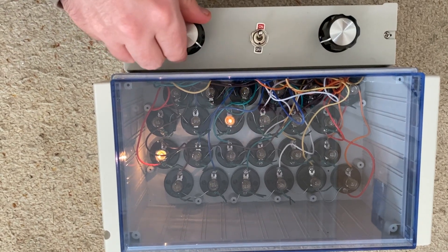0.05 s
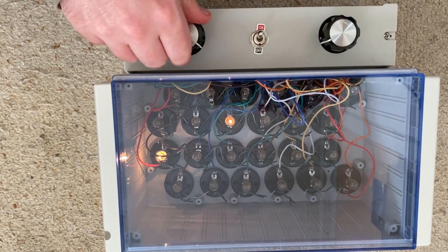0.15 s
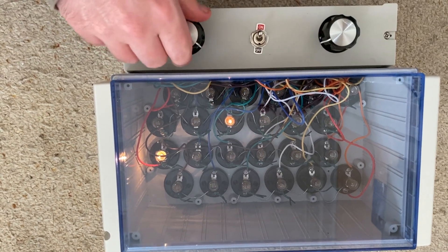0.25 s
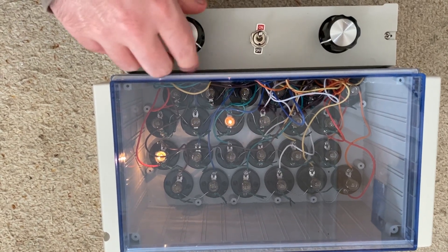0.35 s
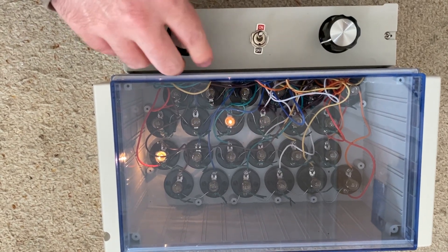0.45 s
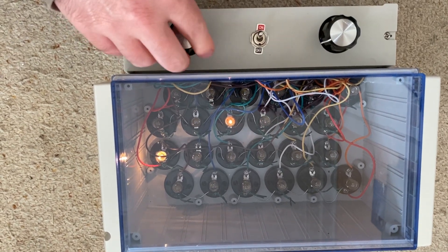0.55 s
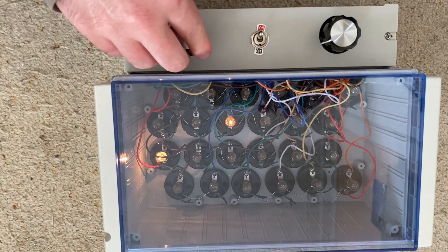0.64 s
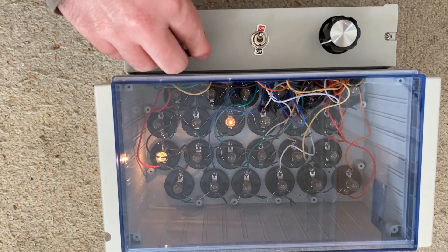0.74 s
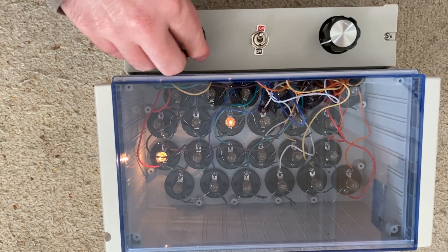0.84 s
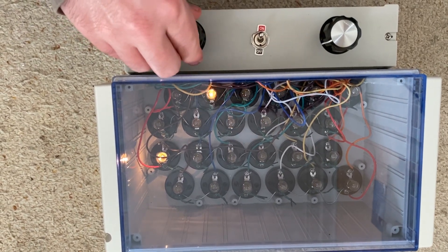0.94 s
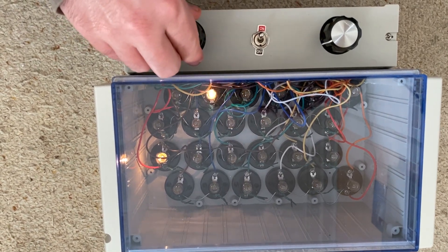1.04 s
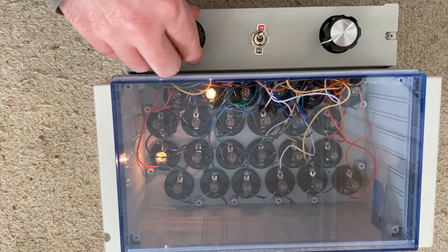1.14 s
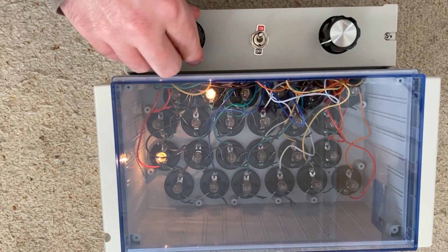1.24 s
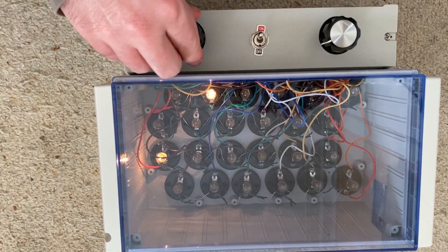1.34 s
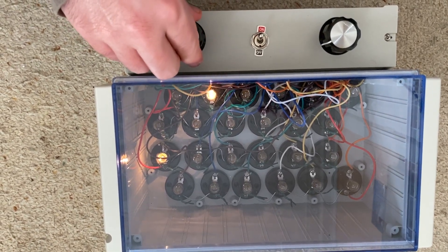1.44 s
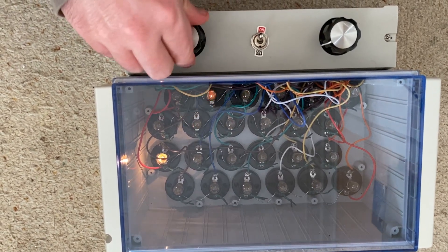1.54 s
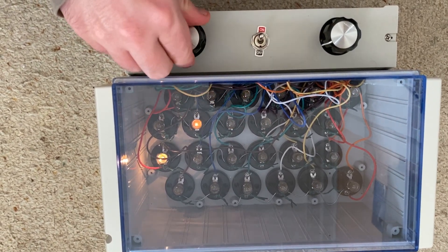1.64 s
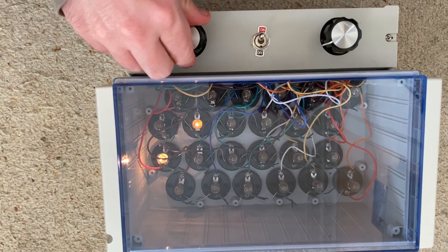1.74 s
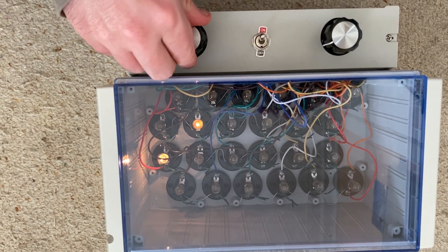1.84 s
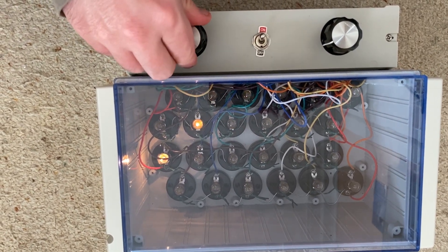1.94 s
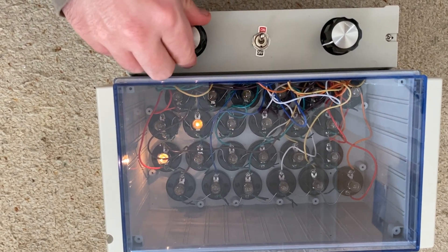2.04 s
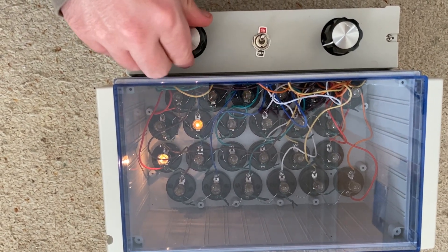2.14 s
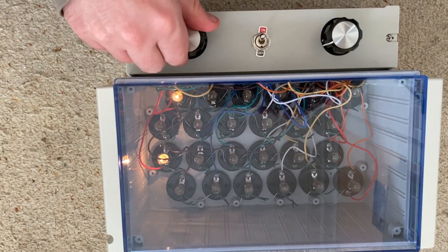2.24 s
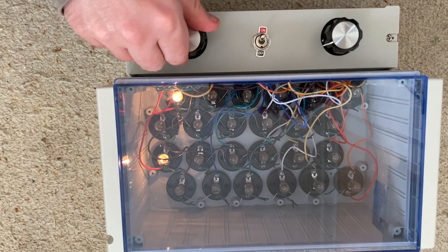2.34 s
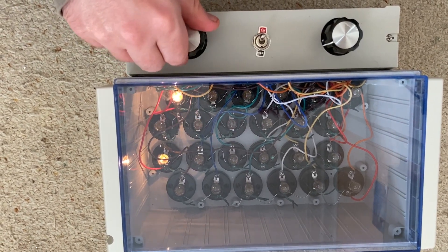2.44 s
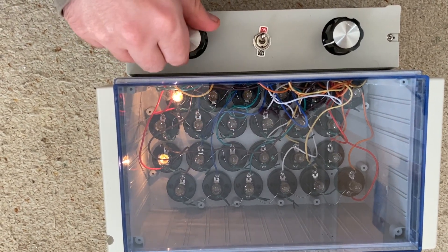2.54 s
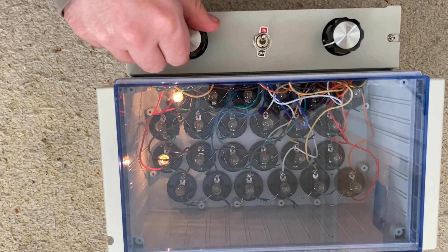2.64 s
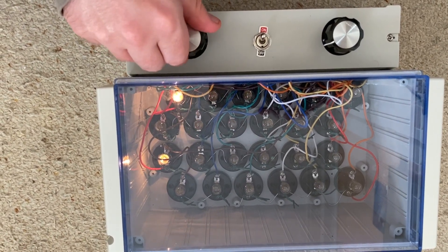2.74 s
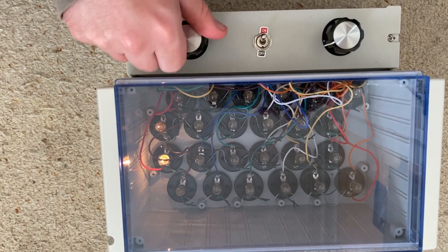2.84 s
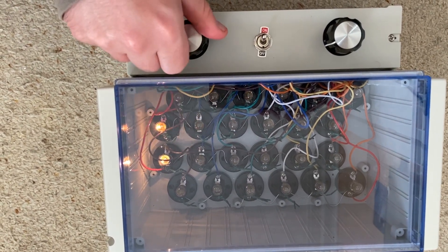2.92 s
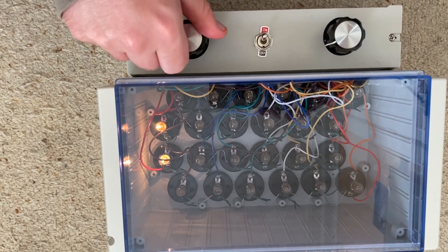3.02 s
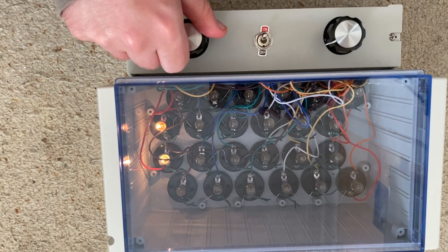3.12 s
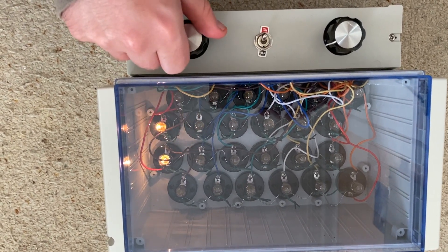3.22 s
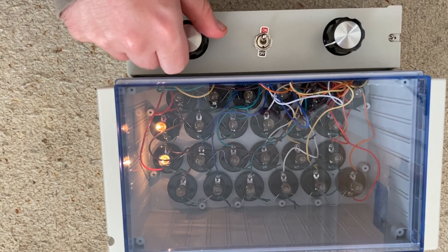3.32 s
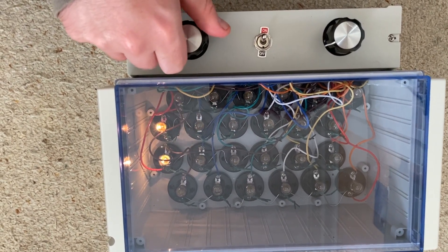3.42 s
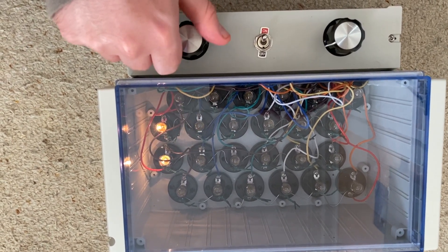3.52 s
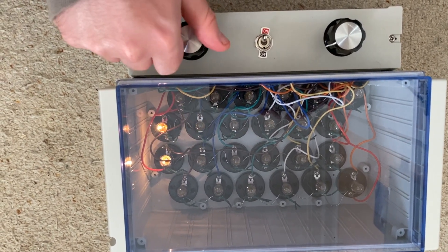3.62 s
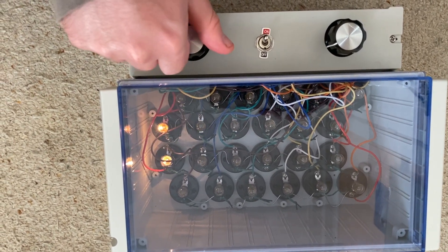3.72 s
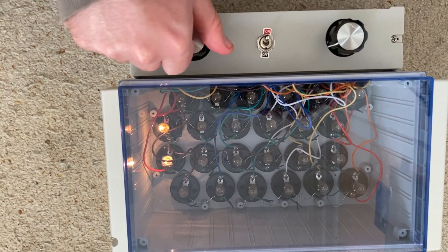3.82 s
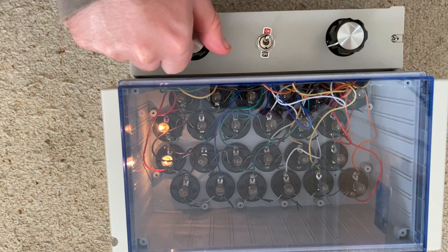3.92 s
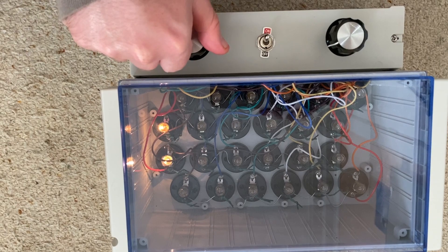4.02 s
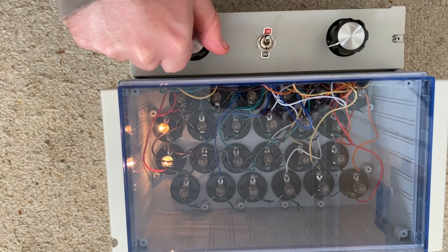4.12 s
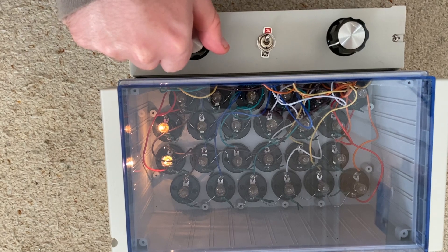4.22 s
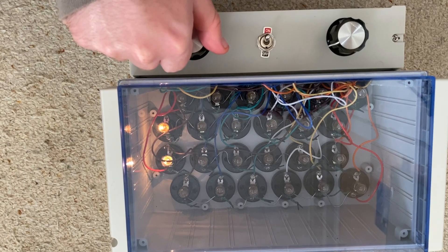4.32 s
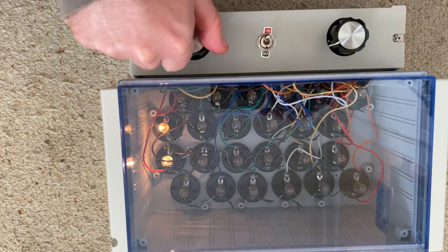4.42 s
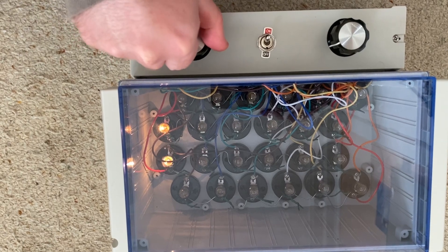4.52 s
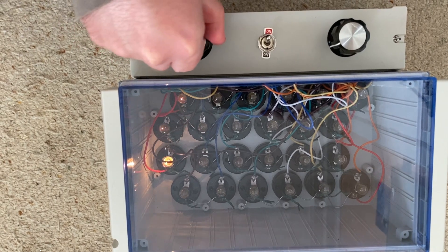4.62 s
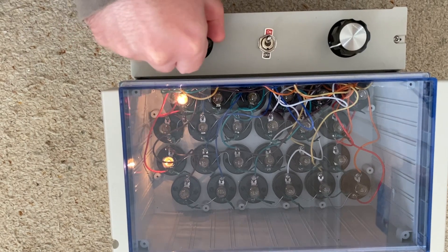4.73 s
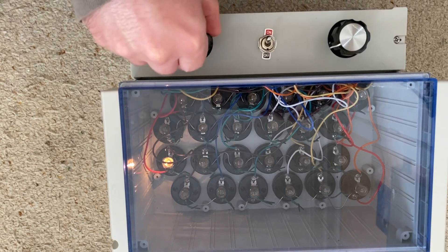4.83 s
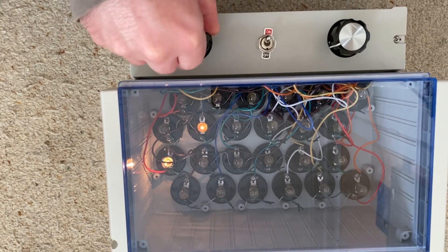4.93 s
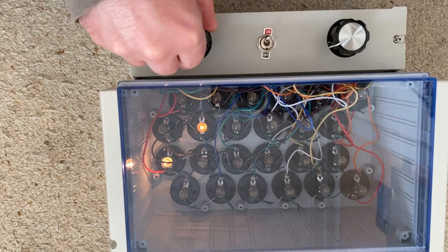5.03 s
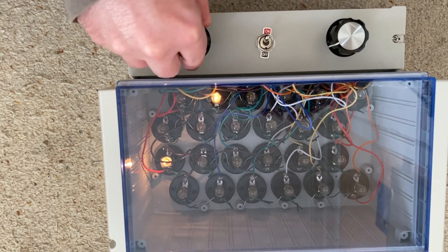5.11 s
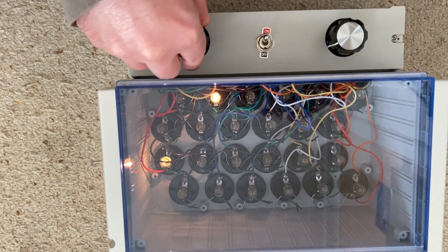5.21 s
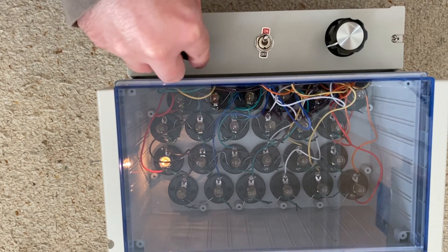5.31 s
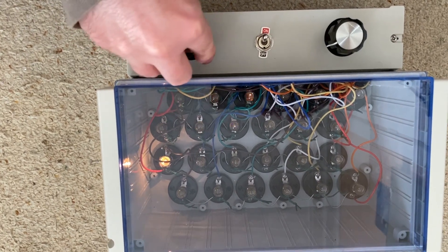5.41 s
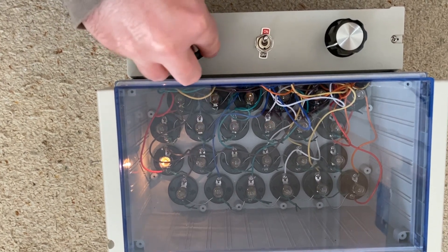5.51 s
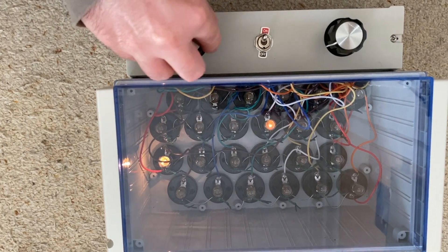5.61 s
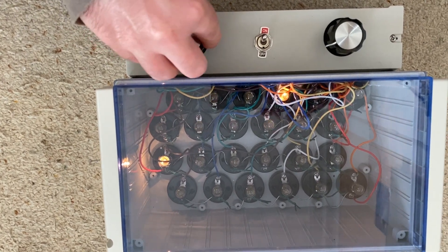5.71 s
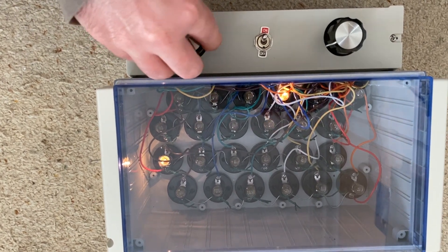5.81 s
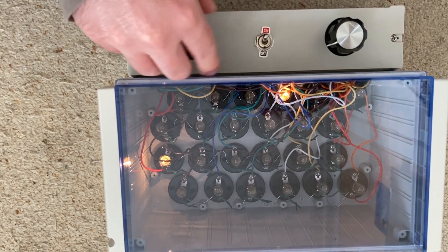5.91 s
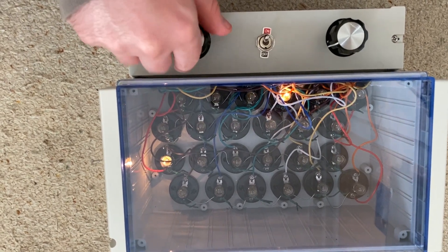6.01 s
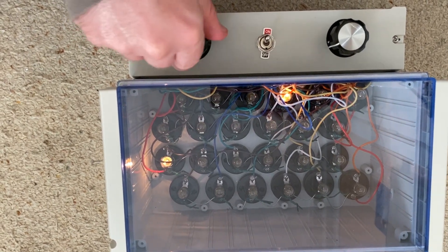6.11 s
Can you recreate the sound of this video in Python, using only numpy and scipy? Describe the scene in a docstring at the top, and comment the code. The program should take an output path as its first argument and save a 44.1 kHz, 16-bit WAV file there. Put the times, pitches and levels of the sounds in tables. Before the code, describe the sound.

A low handling rumble opens, and fingers bump a knob with a round, hollow knock at about 0.3 seconds. A rotary switch then clicks through four slow steps at 0.9, 1.5, 2.2 and 2.8 seconds, the last two softer. Each step is a sharp spring snap with a small knock and clink in a metal panel, plus a dull thud as the plastic box rocks on carpet. A light tick comes just before each. The rumble fades down, and a pause follows with faint ticks near 3.4 and 4.5 seconds. From 4.6 to 5.6 seconds the switch runs through seven quick, crisp clicks. Around 6 seconds the fingers knock the knob and shove the box, making a short cluster of hollow bumps, the loudest moment. Everything is close to the microphone, with short small-room reflections, dull room air and a faint hiss underneath.

```python
"""Fingers bump a knob over a low rumble, then a rotary switch clicks: four slow steps, a quick run of seven.
At each step the detent spring snaps, the shaft seats with a knock in the metal panel, and the plastic
case of the home-made lamp box thuds and rocks on the carpet. Light ticks and soft bumps fall around
the steps. A small room reflects them; room air and a faint hiss lie underneath."""
import sys
import numpy as np
from scipy import signal
from scipy.fft import rfft, irfft, next_fast_len
from scipy.io import wavfile
from scipy.ndimage import uniform_filter1d

SR = 44100
rng = np.random.default_rng(int(sys.argv[2]) if len(sys.argv) > 2 else 0)


def master_out(mix):
    """Clip the mix to full scale and print it as 16-bit PCM to the path in sys.argv[1]."""
    frames = np.transpose(np.atleast_2d(mix))
    ceiling = np.clip(frames, -1, 1)
    pcm = np.round(ceiling * 32767).astype(np.int16)
    wavfile.write(sys.argv[1], SR, pcm)


N = 271656

# switch steps: start_s, snap_db, jolt_db, rebound_lag_s, rebound_vs_snap_db,
#               seat_lag_s, knock_db, clink_db, thud_db, rock_db
STEPS = [(0.9015, -21, -22.5, 0.0011, -15, 0.0077, -18, -28, -22, -14.5),
         (1.545, -22.5, -21, .0031, -1, 0.01, -23.5, -32, -20.5, -19),
         (2.205, -30.5, -27.5, 0.0038, 4, 0.016, -32, -36.5, -23, -19.5),
         (2.8017, -27.5, -26.5, 0.0034, -0.5, .0116, -25, -35.5, -19, -20),
         (4.6228, -17.5, -22.5, 0.0036, -10, 0.0065, -16.5, -27.5, -20.5, -9),
         (4.8032, -21.5, -30.5, 0.0033, -18, 0.024, -36, -52, -27, -19),
         (5.062, -24.5, -24, .0027, 5, 0.011, -20.5, -26.5, -22, -14),
         (5.2769, -17.5, -22, 0.004, -7.5, .0086, -20, -20, -23, -16),
         (5.3970, -18, -21.5, 0.0028, -3, 0.0088, -23.5, -33.5, -27.5, -19.5),
         (5.5004, -18, -23, 0.0032, -10, 0.0095, -30.5, -36, -27, -18.5),
         (5.6392, -20, -25, .0024, -1.5, 0.011, -34, -33, -23.5, -17)]
# knob taking up its play: start_s, panel_db, hardness_hz, spring_db, case_db
TICKS = [(.3280, -29.5, 4000, -46, -19.5), (0.85, -38.5, 2100, -52.5, -28.5),
         (1.514, -38, 4000, -42.5, -22.5), (2.1515, -30, 1780, -45.5, -21), (2.7544, -41.5, 2620, -49, -26),
         (3.4376, -39, 1600, -64, -21.5), (4.5118, -40.5, 1294, -69, -24.5),
         (4.5360, -41.5, 2200, -73, -37.5), (4.995, -50.5, 4000, -60, -50.5),
         (5.863, -43.5, 1295, -61.5, -32.5), (5.939, -22.5, 1600, -38.5, -15.5),
         (5.964, -22.5, 2000, -53, -19)]
# fingers on the knob: start_s, level_db, hardness_hz
BUMPS = [(.140, -35.5, 495), (.3283, -13.5, 1530), (.3343, -11.5, 630), (5.9430, -12, 450),
         (5.9690, -11.5, 495), (5.9725, -8.5, 1460), (5.978, -2, 800)]
# hand shoving the box: start_s, level_db
SHOVES = [(5.015, -17), (5.986, -4)]

# resonances of each part: pitch_hz, width_hz, gain_db
SPRING_MODES = [(4480, 1900, -16), (6450, 310, 0.5), (6910, 2070, -3.5), (7760, 750, -0.5),
                (10060, 1060, -3.5), (11620, 760, -6), (12960, 230, -11.5), (14800, 1300, -21)]
PANEL_MODES = [(772, 10.6, 0.5), (800, 154, 3.5), (919, 142, 5.5), (1106, 250, -2), (1390, 71, 0.5),
               (1617, 252, -2.5), (2000, 400, -2.5), (2635, 92, -6.5), (2995, 100, -4.5), (4000, 990, -4.5),
               (4380, 840, -1), (7800, 2060, -8.5)]
SHAFT_MODES = [(2290, 320, 2.5), (3670, 146, 2.5), (4550, 380, 7)]
CASE_MODES = [(119.8, 9.7, 2.5), (153.8, 15.8, -0.5), (265.3, 34, -4.5), (334.7, 16, -3.5), (399.4, 39, -5),
              (491.5, 14.7, -9.5), (540, 31, -14.5), (711, 34, -8), (750, 50, -7), (1060, 590, -17.5),
              (1340, 110, -24.5)]
CHASSIS_MODES = [(152.7, 15, 0), (267.5, 30.6, 3), (334.4, 28.7, 3), (544, 71, -12.5), (543.5, 17, -10),
                 (723, 240, -21.5), (761, 48, -3), (960, 350, -16), (1200, 360, -16.5), (1600, 590, -27)]

# wall reflections: freq_hz, gain_db
ROOM_GAIN = [(60, -22.5), (300, -5.5), (700, -6), (1700, -1.5), (3000, -6.5), (5000, -5), (8000, -12.5),
             (11000, -11), (15000, -14.5)]
# room decay: freq_hz, t60_s
ROOM_DECAY = [(100, 0.49), (700, 0.24), (2000, 0.22), (6000, 0.23), (16000, 0.16)]
# stereo width at the microphone ports: freq_hz, side_vs_mid_db
PORT_WIDTH = [(60, -23), (300, -18.5), (800, -6.5), (1200, -5.5), (1600, 0), (2400, -3.5), (4500, -2),
              (6500, -13.5), (8200, 1.5), (10400, -8), (12000, -3), (16000, 13)]
# port balance: freq_hz, left_vs_right_db
PORT_BALANCE = [(100, 0), (330, -2), (750, -2.5), (1500, -3), (4000, 5.5), (10000, -2)]

# handling rumble and room air over time: time_s, level_db
RUMBLE_LEVEL = [(0, -45.5), (.17, -45), (.3, -49), (.9, -53), (1.15, -56.5), (1.47, -61), (1.62, -53.5),
                (1.85, -67), (2.1, -65.5), (2.25, -55.5), (2.85, -52), (2.95, -55), (3.45, -59),
                (3.9, -68.5), (4.6, -65.5), (5.3, -61), (5.55, -59.5), (6.16, -58.5)]
AIR_LEVEL = [(0.0, -75.5), (1.44, -76.5), (2.6, -81)]
# background noise shapes: freq_hz, relative_density_db
DEEP_RUMBLE_SPECTRUM = [(22, -63), (32, -8), (41, 7), (52, -2.5), (70, -10), (120, -15), (170, -32),
                        (300, -39), (600, -96)]
LATE_RUMBLE_SPECTRUM = [(22, -50), (35, -17), (45, -12), (58, 3.5), (72, -0.5), (90, -11), (115, -9.5),
                        (150, -22), (300, -43), (600, -74)]
AIR_SPECTRUM = [(100, -1.5), (200, 3), (380, -1), (550, -7), (850, -7), (1400, -14.5), (2500, -25.5),
                (5000, -32.5), (12000, -80)]
HISS_SPECTRUM = [(300, 0), (1500, -3.5), (3000, -6), (7000, -8.5), (9000, -9.5), (11800, -10),
                 (13000, -21.5), (16000, -19)]

PANEL_PATCH_HZ = 675  # width of the random colour patches in each panel blow


def snaps(hardness_hz):
    """Two spring strikes per step, snap and rebound: start_s, level_db, hardness_hz."""
    return [hit for s, db, _, lag_s, rebound_db, *_ in STEPS
            for hit in ((s, db, hardness_hz), (s + lag_s, db + rebound_db, hardness_hz))]


def detent():
    """The spring skids off its cam, rings high and jolts the panel; a tick only brushes it."""
    skids = contacts(snaps(hardness_hz=17400), chatter_s=0.00089, rough=8)
    brushes = contacts([(s, db, 14000) for s, _, _, db, _ in TICKS], chatter_s=0.0021, rough=0.97)
    jolts = contacts([(s, db, 5000) for s, _, db, *_ in STEPS],
                     chatter_s=0.0033, rough=3.9, even_hz=PANEL_PATCH_HZ)
    spring = cut(resonate(skids + brushes, SPRING_MODES), 5000, "high")
    return spring + panel(jolts)


def shaft():
    """The steel shaft knocks home and clinks after each snap, and ticks under finger load."""
    seatings = [(s + lag_s, knock_db, clink_db) for s, *_, lag_s, knock_db, clink_db, _, _ in STEPS]
    knocks = contacts([(s, db, 2600) for s, db, _ in seatings],
                      chatter_s=0.00086, rough=2.0, even_hz=PANEL_PATCH_HZ)
    ticks = contacts([row[:3] for row in TICKS], chatter_s=0.0023, rough=1.0)
    clinks = contacts([(s, db, 9000) for s, _, db in seatings], chatter_s=0.001, rough=1.03)
    return panel(knocks + ticks) + resonate(clinks, SHAFT_MODES)


def panel(force):
    """The struck metal panel rings, with little bass."""
    return cut(resonate(force, PANEL_MODES), 280, "high")


def case(thud_lag_s=0.007, settle_lag_s=0.019, nudge_lag_s=0.00523):
    """Low, short modes of the hollow plastic: a thud and a softer settling per step, a nudge per tick."""
    thuds = [(s + thud_lag_s, db, 630) for s, *_, db, _ in STEPS]
    settles = [(s + settle_lag_s, db - 2, 408) for s, *_, db, _ in STEPS]
    nudges = [(s + nudge_lag_s, db, 450) for s, *_, db in TICKS]
    return resonate(contacts(thuds + settles + nudges, chatter_s=0.0081, rough=1.0), CASE_MODES)


def rocking(lag_s=0.0343, pitch_hz=64.5, width_hz=12.5):
    """The box bounces on the carpet for a few cycles after each step or shove."""
    pushes = [(s + lag_s, db) for s, *_, db in STEPS] + SHOVES
    force = contacts([(s, db, 200) for s, db in pushes], chatter_s=0.0013, rough=0.02)
    swing = resonate(force, [(pitch_hz, width_hz, 0)])
    return cut(swing, [42, 90], "band")


def knob():
    """Soft fingertips push knob and chassis along the shaft: a round, hollow knock."""
    return resonate(contacts(BUMPS, chatter_s=0.0072, rough=0.12), CHASSIS_MODES)


def contacts(hits, chatter_s, rough, even_hz=400):
    """Force of hits (start_s, level_db, hardness_hz): a push plus dying chatter, duller when soft."""
    out = np.zeros(N + SR)
    t = np.arange(-SR // 64, SR // 16) / SR
    age_s = np.maximum(t, 0)
    even_bins = max(1, round(even_hz * len(t) / SR))
    for (start_s, level_db, hardness_hz), noise in zip(hits, rng.standard_normal((len(hits), len(t)))):
        chatter = noise * np.exp(-age_s / chatter_s) * (1 - np.exp(-4 * age_s / chatter_s))
        spectrum = rfft((t == 0) + rough * chatter / np.linalg.norm(chatter))
        # flattened: chatter spreads the blow in time but favours no pitch
        spectrum /= np.sqrt(uniform_filter1d(np.abs(spectrum) ** 2, even_bins))
        at = round((start_s + t[0]) * SR)
        out[at:at + len(t)] += from_db(level_db) * cut(irfft(spectrum, len(t)), hardness_hz, "low")
    return out[:N]


def resonate(force, modes):
    """Parallel resonances of alternating sign; a unit click leaves with unit energy."""
    click = signal.unit_impulse(SR // 2) + 1e-18
    response = 0
    for k, (pitch_hz, width_hz, gain_db) in enumerate(modes):
        radius = np.exp(-np.pi * width_hz / SR)
        feedback = [1, -2 * radius * np.cos(2 * np.pi * pitch_hz / SR), radius ** 2]
        ring = (1 - radius ** 2) * signal.lfilter([1, 0, -1], feedback, click)
        response += (-1) ** k * from_db(gain_db) * ring
    return signal.oaconvolve(force, response / np.linalg.norm(response))[:N]


def spill():
    """Treble of each snap, sent sideways to the walls."""
    force = contacts(snaps(hardness_hz=15000), chatter_s=0.00022, rough=0.99)
    return cut(force, 1500, "high", order=1)


def ports(x):
    """Near sound reaches two microphone ports with pitch-dependent phase and level differences."""
    side = colour(x, PORT_WIDTH, phase_factor=1j)
    return np.array([colour(x + sign * side, [(hz, sign * db / 2) for hz, db in PORT_BALANCE])
                     for sign in (1, -1)])


def room(x, build_s=0.0016):
    """Dense reflections, different at each port, build up and die band by band."""
    t = np.arange(SR // 2) / SR
    edges_hz = np.geomspace(40, 19000, num=14)
    tail = 0
    for low_hz, high_hz in zip(edges_hz, edges_hz[1:]):
        centre_hz = np.sqrt(low_hz * high_hz)
        fade = from_db(-60 * t / at_hz(ROOM_DECAY, centre_hz)) * (1 - np.exp(-t / build_s))
        noise = unit_rms(cut(rng.standard_normal((2, len(t))), [low_hz, high_hz], "band"))
        gain = from_db(at_hz(ROOM_GAIN, centre_hz)) * np.sqrt(2 * (high_hz - low_hz) / SR)
        tail += gain * noise * fade / np.linalg.norm(fade)
    return signal.oaconvolve(x[None], tail, axes=1)[:, :N]


def swaying_room(x, sway_hz=0.8):
    """As the microphone sways, one pattern of reflections gives way to another."""
    angle = 2 * np.pi * sway_hz * np.arange(N) / SR
    return np.cos(angle) * room(x) + np.sin(angle) * room(x)


def rumble():
    """Low handling rumble; starts deep, then lightens."""
    deep_share = np.interp(np.arange(N) / SR, [1.1, 2.1], [1, 0.15])
    deep = np.sqrt(deep_share) * noise_bed(DEEP_RUMBLE_SPECTRUM, side_db=-19)
    late = np.sqrt(1 - deep_share) * noise_bed(LATE_RUMBLE_SPECTRUM, side_db=-17.5)
    noise = cut(cut(deep + late, 34, "high", order=8), 450, "low")
    running_rms = np.sqrt(uniform_filter1d(np.mean(noise ** 2, axis=0), SR // 4))
    return envelope(RUMBLE_LEVEL) * noise / running_rms


def air():
    """Dull room noise that slowly sinks."""
    return envelope(AIR_LEVEL) * noise_bed(AIR_SPECTRUM, side_db=-2.5)


def hiss(level_db=-87):
    """Steady microphone hiss."""
    return from_db(level_db) * noise_bed(HISS_SPECTRUM, side_db=-1.5)


def noise_bed(spectrum, side_db):
    """Steady stereo noise, mid at unit rms."""
    mid, side = colour(rng.standard_normal((2, N)), spectrum)
    return unit_rms(mid) + from_db(side_db) * unit_rms(side) * [[1], [-1]]


def colour(x, spectrum, phase_factor=1):
    """Filter by rows of freq_hz, gain_db."""
    size = next_fast_len(x.shape[-1] + SR // 8)
    gain = from_db(at_hz(spectrum, np.fft.rfftfreq(size, 1 / SR)))
    return irfft(rfft(x, size) * phase_factor * gain, size)[..., :x.shape[-1]]


def cut(x, hz, kind, order=2):
    """Butterworth filter; kind names the passband."""
    return signal.sosfilt(signal.butter(order, np.clip(hz, 10, .45 * SR), kind, fs=SR, output="sos"), x)


def at_hz(rows, hz):
    """Table lookup on a log-frequency axis."""
    known_hz, values = np.transpose(rows)
    return np.interp(np.log(np.maximum(hz, 1)), np.log(known_hz), values)


def envelope(rows):
    """Gain per sample from rows of time_s, level_db."""
    return from_db(np.interp(np.arange(N) / SR, *np.transpose(rows)))


def from_db(db):
    """Decibels to gain."""
    return 10 ** (np.asarray(db) / 20)


def unit_rms(x):
    """Scale to rms 1."""
    return x / np.sqrt(np.mean(x ** 2) + 1e-20)


def scene(box_send_db=0.5, knob_send_db=-2.5, spill_send_db=-0.5):
    """The box close up in the room; the knob, covered by the hand, sends less to the walls."""
    box = detent() + shaft() + case() + rocking()
    bumps = knob()
    to_walls = from_db(box_send_db) * box + from_db(knob_send_db) * bumps
    to_walls += from_db(spill_send_db) * spill()
    return ports(box + bumps) + swaying_room(to_walls) + rumble() + air() + hiss()


def record(dry, notch_hz=9200, notch_q=5, cutoff_hz=16500):
    """Treble notch in what both ports share, then a steep low-pass."""
    mid, side = (dry[0] + dry[1]) / 2, (dry[0] - dry[1]) / 2
    mid = signal.lfilter(*signal.iirnotch(notch_hz, notch_q, fs=SR), mid)
    lowpass = signal.ellip(10, 0.3, 70, cutoff_hz, fs=SR, output="sos")
    return signal.sosfilt(lowpass, np.array([mid + side, mid - side]))


dry = scene()
out = record(dry)
master_out(out)
```